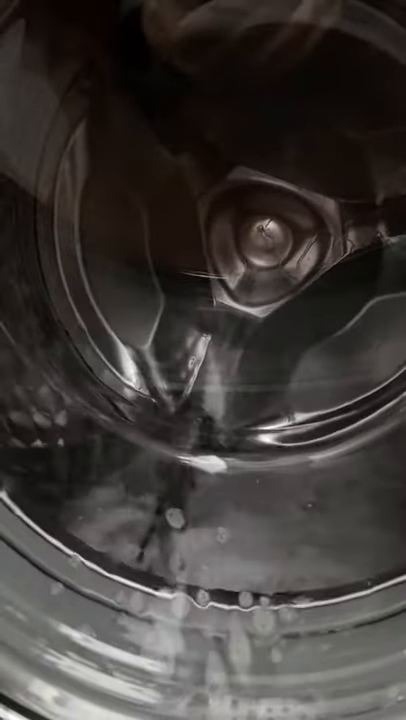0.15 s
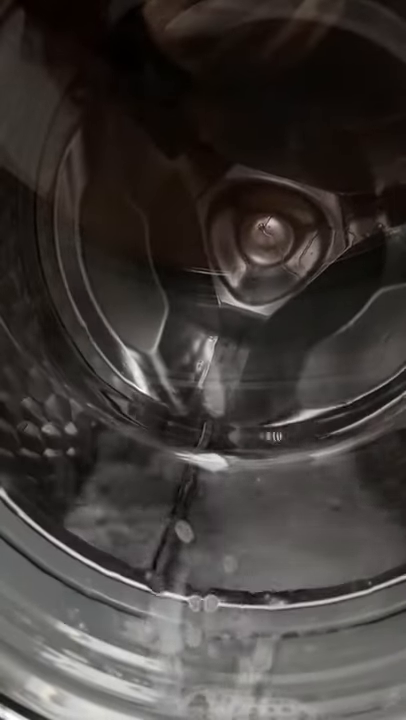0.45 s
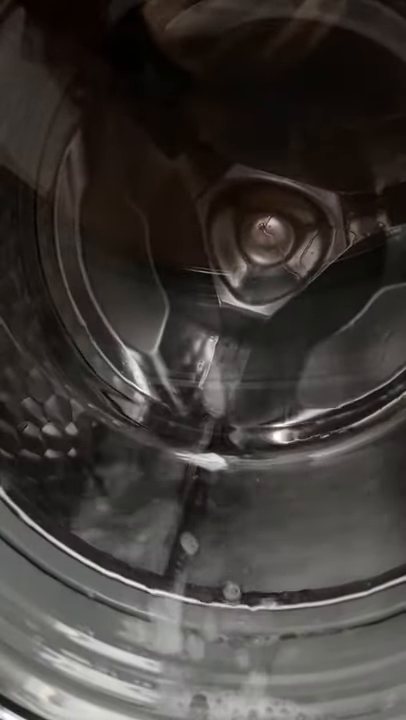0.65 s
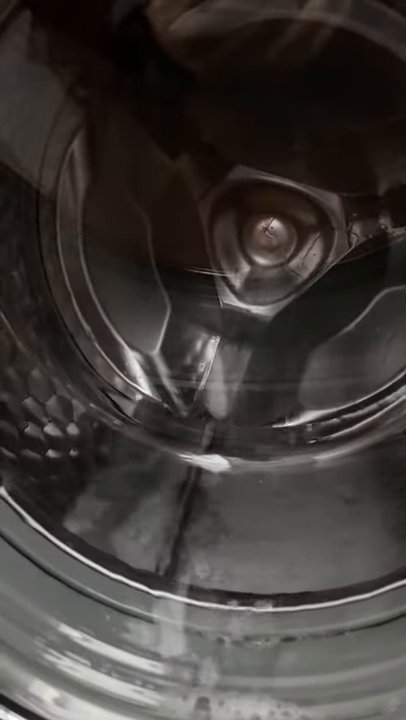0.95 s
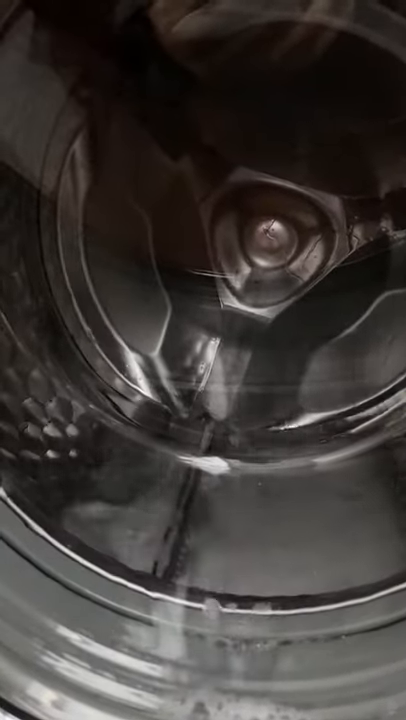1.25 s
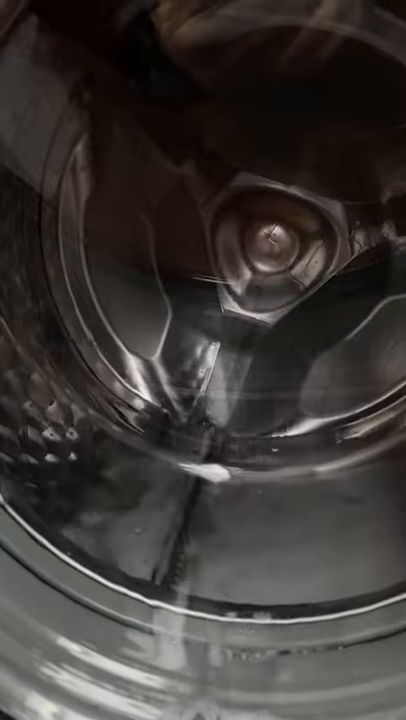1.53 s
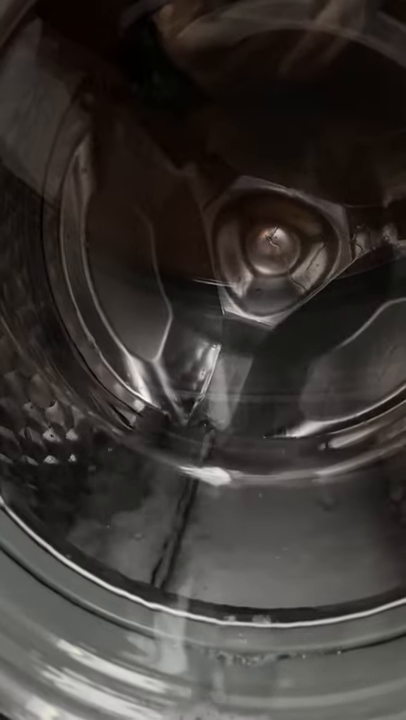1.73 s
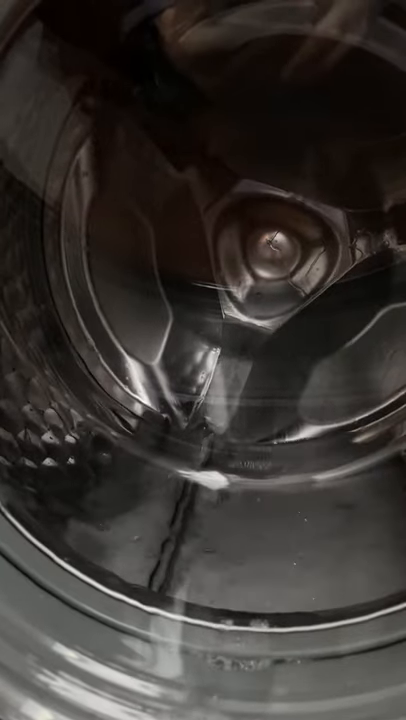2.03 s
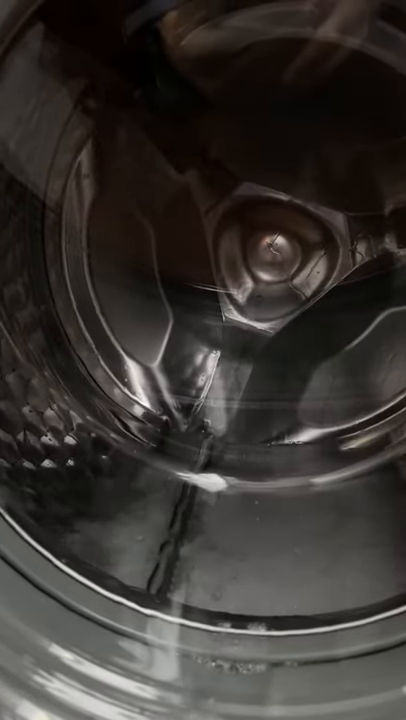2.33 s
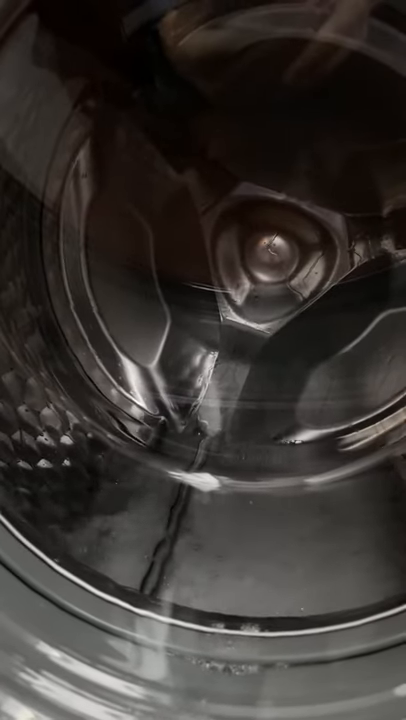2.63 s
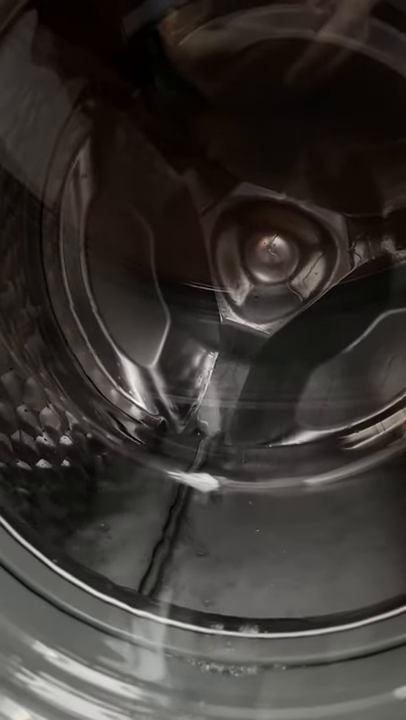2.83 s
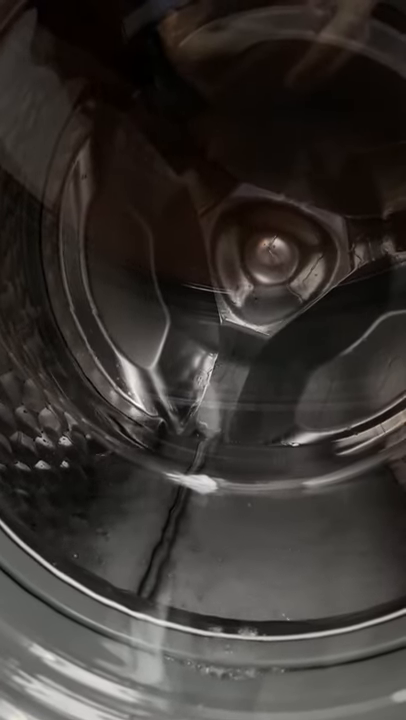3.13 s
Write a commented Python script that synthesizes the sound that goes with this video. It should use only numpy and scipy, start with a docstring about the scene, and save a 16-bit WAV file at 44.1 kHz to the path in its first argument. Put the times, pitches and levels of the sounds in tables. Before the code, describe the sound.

Water trickles and spatters inside a front-loading washing machine, heard close over a deep, wavering motor hum. A soft glug comes at about 0.2 seconds, followed by gentle sloshes and gurgles. Plopping drops are busiest from 0.9 to 1.8 seconds, ringing faintly on the steel drum. After 2 seconds the trickle thins to a few drips and faint sloshes, while the hum continues past 3 seconds.

```python
"""Wet load in a washing machine

A front-loader turns slowly, heard at the door in a small room. The drive hums through the cabinet.
Water trickles, plops and spatters, thins to a few drips, and sloshes as the load shifts. Trapped air
bubbles ring as damped oscillators, and the drops excite the modes of the steel drum."""
import sys
import numpy as np
from scipy import signal
from scipy.fft import rfft, irfft, next_fast_len
from scipy.io import wavfile
from scipy.ndimage import map_coordinates

SR = 44100
rng = np.random.default_rng(int(sys.argv[2]) if len(sys.argv) > 2 else 0)


def bounce(signal):
    """Save signal as a 16-bit WAV file at the path given by the first command-line argument."""
    frames = np.transpose(np.atleast_2d(signal))
    limited = np.clip(frames, -1, 1)
    pcm = np.round(limited * 32767).astype(np.int16)
    wavfile.write(sys.argv[1], SR, pcm)


N = 144648

# Strength of the running water. Each row: time in seconds, relative level in dB.
WATER_FLOW = [(0, -69), (.3, -73.5), (.65, -75.5), (.95, -70.5), (1.15, -70), (1.5, -72), (1.75, -79),
              (2.0, -76), (2.25, -86), (3.28, -92.5)]
# Drops that trap a bubble. Each row: time in seconds, relative peak level in dB, pitch in Hz.
BUBBLE_DROPS = [(.254, -47, 1200), (.385, -54.5, 2100), (.466, -51.5, 1220), (.625, -52.5, 1116),
                (.89, -53.5, 1223), (.928, -51, 1025), (1.016, -50.5, 1844), (1.034, -47.5, 1280),
                (1.273, -44, 1304), (1.335, -48, 1150), (1.435, -46, 1272), (1.447, -48.5, 1773),
                (1.552, -45.5, 1936), (1.625, -51, 1225), (1.673, -50, 816), (1.715, -52.5, 1034),
                (1.819, -46.5, 1020), (1.831, -51, 1370), (2.132, -56.5, 1210), (2.343, -52, 1580),
                (2.518, -61.5, 1560), (2.591, -56.5, 1226), (2.70, -55, 1227), (2.765, -60.5, 1336)]


def amp(db):
    """Amplitude grows tenfold for every 20 dB."""
    return 10 ** (np.asarray(db) / 20)

def unit(x):
    """Normalisation to an rms of 1."""
    return x / np.sqrt(np.mean(x ** 2) + 1e-20)

def pan(db):
    """Stereo gains for a level difference, left minus right."""
    return amp(db * np.array([[.5], [-.5]]))

def along(points, hz):
    """Interpolation of (Hz, value) points on a logarithmic frequency axis."""
    freqs, values = np.transpose(points)
    return np.interp(np.log(hz + 1), np.log(freqs + 1), values)

def envelope(rows):
    """Gain per sample, interpolated in dB between (seconds, dB) points."""
    times, levels = np.transpose(rows)
    return amp(np.interp(np.arange(N) / SR, times, levels))

def wobble(rate):
    """Smooth random modulation through `rate` knots a second."""
    return map_coordinates(rng.standard_normal(200), [np.arange(N) * rate / SR], mode="wrap")

def filtered(x, response):
    """Linear filtering: the spectrum is multiplied by a frequency response."""
    n = x.shape[-1]
    padded = next_fast_len(n + SR // 10)
    return irfft(rfft(x, padded) * response(np.fft.rfftfreq(padded, 1 / SR)), padded)[..., :n]

def coloured(x, spectrum):
    """Spectral shaping by (Hz, dB) points, at rms 1."""
    return unit(filtered(x, lambda hz: amp(along(spectrum, hz))))

def add(out, start_s, x):
    """Superposition of x on out, from a given time."""
    i = max(0, round(start_s * SR))
    out[..., i:i + x.shape[-1]] += x[..., :max(0, N - i)]

def noise(size=N):
    """Partly coherent white noise: left and right agree in the bass, far less in the treble."""
    # Each row: frequency in Hz, left-right correlation from -1 to 1.
    correlation = [(110, 1), (330, 0.87), (650, -0.16), (1300, 0.32), (2800, 0.07), (5500, -0.14),
                   (11000, -0.6)]
    def mid_side_gains(hz):
        angle = np.arccos(np.clip(along(correlation, hz), -1, 1)) / 2
        return np.array([np.cos(angle), np.sin(angle)])
    mid, side = filtered(rng.standard_normal((2, size)), mid_side_gains)
    return np.array([mid + side, mid - side])

def rumble(modes):
    """Forced vibration: noise drives a body's resonances, at rms 1."""
    def response(f):
        return sum(amp(db) / (1 + ((f - hz) / half_width) ** 2) for hz, half_width, db in modes)
    return unit(filtered(noise(), response))

def in_tub(x, tail_db=8):
    """Reverberation: the direct sound is followed by a short stereo tail from the tub."""
    # Each row: frequency in Hz, time to decay by 60 dB in seconds.
    decay_times = [(300, 0.42), (1500, 0.088), (5000, 0.1), (12000, 0.063)]
    hz, t, spectra = signal.stft(noise(size=SR // 6), SR, nperseg=256)
    tail = signal.istft(spectra * amp(-60 * t / along(decay_times, hz)[:, None]), SR, nperseg=256)[1]
    tail *= amp(tail_db) / np.linalg.norm(tail[0])
    reflected = signal.fftconvolve(x[None], tail, axes=1)[:, :len(x)]
    return (x + reflected) / np.hypot(1, amp(tail_db))

def bubble(t, hz, cycles, rise, attack_s):
    """A damped oscillator: it loses 60 dB in `cycles` periods and rises in pitch near the surface."""
    age = t * hz / cycles
    phase = 2 * np.pi * hz * t * (1 + rise * (age - .5) / 2)
    return np.sin(phase) * amp(-60 * age) * (1 - np.exp(-t / attack_s))

def bubbles(per_s, low_hz, high_hz, cycles, spread_db):
    """Superposition of bubbles at random times and pitches, mostly faint, a few loud."""
    when, pitch, strength = rng.random((5000, 3))[:int(per_s * N / SR)].T[..., None]
    k = np.arange(min(SR // 40, int(SR * cycles / low_hz)))
    hz = low_hz * (high_hz / low_hz) ** pitch
    gain = amp(spread_db * strength ** 3) * hz / low_hz
    rings = gain * bubble(k / SR, hz, cycles, rise=0.11, attack_s=0.00018)
    positions = (when * N).astype(int) + k
    return np.bincount(positions.ravel(), rings.ravel(), N)[:N]

def drive(hum_hz=45.6, waver_db=3.5):
    """Forced vibration: the drive makes a deep hum and weaker wavering tones, and shakes the cabinet."""
    # The deep hum. Each row: time in seconds, rms level in dB.
    hum_levels = [(0, -36.5), (.46, -43.5), (.65, -36), (.91, -46), (1.43, -39), (1.86, -48.5),
                  (2.07, -39.5), (2.6, -43.5), (2.71, -38), (3.07, -47)]
    # The drive's tones. Each row: frequency in Hz, rms level in dB.
    tones = [(58, -58), (102, -61.5), (183.5, -72.5), (1284, -88.5)]
    # Cabinet resonances. Each row: frequency in Hz, half-width in Hz, relative level in dB.
    cabinet_modes = [(43.3, 24, 3), (102.7, 7.4, 4), (126, 18, -4), (188.3, 13, -5.5), (274.3, 29, -15.5),
                     (364.7, 12, -16), (600, 43, -17.5)]
    t = np.arange(N) / SR
    hum = envelope(hum_levels) * np.sin(2 * np.pi * hum_hz * t)
    for hz, db in tones:
        hum += amp(db + waver_db * wobble(10)) * np.sin(2 * np.pi * hz * t + wobble(4.743))
    return np.sqrt(2) * hum + amp(-54.5) * rumble(cabinet_modes)

def room_air():
    """Stationary background noise, strongest in the bass."""
    # Each row: frequency in Hz, relative spectral level in dB.
    air_spectrum = [(25, -14.5), (80, -4.5), (170, -8), (320, -22), (620, -20.5), (900, -30.5),
                    (1260, -27.5), (1600, -36), (6000, -43.5), (12500, -51.5)]
    return amp(-66) * coloured(noise(), air_spectrum)

def trickle(fizz_db=-0.5):
    """Air entrainment: water running off the load traps small ringing bubbles over a fine fizz."""
    # Each row: frequency in Hz, filter gain in dB.
    trickle_colour = [(300, -43), (600, -2), (1100, -9.5), (1550, -15), (2500, -15.5), (4100, -15),
                      (5000, -22.5), (5800, -20.5), (7900, -23.5), (9000, -33), (10400, -25.5),
                      (12500, -57)]
    stream = unit(bubbles(per_s=700, low_hz=974, high_hz=13100, cycles=13, spread_db=19))
    fizz = amp(fizz_db) * rng.standard_normal(N)
    return amp(3) * envelope(WATER_FLOW) * coloured(in_tub(stream + fizz), trickle_colour)

def steel(hz, t60, attack_s, lag_s=0.00005):
    """One exponentially decaying mode of the drum, reaching the right side a little later."""
    t = np.maximum(np.arange(SR // 2) / SR - lag_s * np.array([[0], [1]]), 0)
    return np.sin(2 * np.pi * hz * t) * amp(-60 * t / t60) * (1 - np.exp(-t / attack_s))

def drum_ring(strikes_per_s=260, spread_db=3, flutter_db=3):
    """Random impact excitation: pattering water keeps the steel drum's modes shimmering."""
    # Each row: mode frequency in Hz, level in dB relative to the flow.
    drum_modes = [(1174, -4.5), (1884, -9.5), (2542, -11), (2922, -7.5), (3603, -19), (6243, -21.5)]
    landings = rng.integers(0, N, int(strikes_per_s * N / SR))
    flow, out = envelope(WATER_FLOW), np.zeros((2, N))
    for hz, db in drum_modes:
        forces = amp(spread_db * rng.standard_normal(len(landings)))
        strikes = flow * unit(np.bincount(landings, forces, N))
        mode = steel(hz, t60=.11, attack_s=0.0033)
        ring = signal.fftconvolve(strikes[None], mode / np.linalg.norm(mode[0]), axes=1)[:, :N]
        out += amp(db + flutter_db * wobble(58)) * ring
    return out

def churn(glug_s=.178, glug_hz=565):
    """Resonance of the tub and of large bubbles: moving water rumbles, gurgles and glugs once."""
    # Rumble and gurgle envelopes. Each row: time in seconds, relative level in dB.
    rumble_levels = [(0, -78), (.3, -61.5), (1.05, -58), (1.7, -64), (2.4, -69.5), (2.75, -65.5),
                     (3.28, -83)]
    gurgle_levels = [(0, -76), (.28, -63), (.57, -74.5), (1.05, -64.5), (1.8, -65.5), (2.02, -71.5),
                     (2.3, -65.5), (2.49, -85.5), (2.64, -70.5), (2.95, -69), (3.1, -88), (3.28, -65.5)]
    # Tub resonances. Each row: frequency in Hz, half-width in Hz, relative level in dB.
    tub_modes = [(258.4, 22.7, -0.5), (288.7, 10, -11), (356.7, 11, -6), (417.4, 24, -9)]
    # Each row: frequency in Hz, filter gain in dB.
    gurgle_colour = [(200, -43), (450, -3), (620, 5), (780, 4.5), (1000, -2.5), (1400, -8), (2200, -39.5),
                     (5000, -60)]
    stream = bubbles(per_s=300, low_hz=416.6, high_hz=1372, cycles=18, spread_db=18)
    gurgle = envelope(gurgle_levels) * coloured(in_tub(stream), gurgle_colour)
    out = amp(-0.5) * (envelope(rumble_levels) * rumble(tub_modes) + gurgle)
    glug = bubble(np.arange(SR // 5) / SR, glug_hz, cycles=75, rise=0.054, attack_s=0.033)
    add(out, glug_s, amp(-42) * glug)
    return out

def drops(rows, cycles, rise, attack_s, lead_s, splash_db, splash_t60):
    """Impact and entrainment: each drop makes a brief splash, a bubble and two fainter ones."""
    splash_octaves, scatter_octaves, follow_s, follow_db = 0.52, 0.18, .018, -9
    out, t = np.zeros((2, N)), np.arange(SR // 6) / SR
    for time_s, db, hz in rows:
        def splash_band(f):
            return 1 / (1 + (np.log2((f + 1) / hz) / splash_octaves) ** 2) ** 1.55
        splash = unit(filtered(rng.standard_normal(len(t)), splash_band))
        splash *= amp(splash_db - 60 * t / splash_t60) * (1 - np.exp(-t / attack_s))
        rings = bubble(t, hz, cycles, rise, attack_s)
        for late, pitch in rng.random((2, 2)):
            delayed = np.maximum(t - follow_s * late, 0)
            follower_hz = hz * 2 ** (scatter_octaves * (2 * pitch - 1))
            rings += amp(follow_db) * bubble(delayed, follower_hz, cycles, rise, attack_s)
        drop = in_tub(rings + splash)
        add(out, time_s - lead_s, amp(db) * drop / np.abs(drop).max())
    return out

def ticks():
    """Impact transients: small drops on steel and glass make short, high rings."""
    # Each row: time in seconds, relative peak level in dB, pitch in Hz.
    small_drops = [(.094, -54, 6030), (.158, -67.5, 7260), (.193, -63, 5560), (.251, -61, 3700),
                   (.29, -60, 3010), (.43, -69.5, 10200), (.455, -64.5, 3570), (.514, -61, 3980),
                   (.834, -62.5, 3740), (.845, -68.5, 10100), (.943, -60, 6840), (1.297, -54, 4070),
                   (1.44, -64.5, 7000), (1.503, -60.5, 5900), (1.817, -65.5, 6150), (1.645, -61, 4460),
                   (2.03, -60, 2800)]
    return amp(1.5) * drops(small_drops, cycles=195, rise=0.076, attack_s=.005,
                            lead_s=0.0035, splash_db=-4, splash_t60=0.045)

def drum_pings(struck_hz=2922, coupling_db=-11.5, loss_db_per_octave=16, flutter_db=2.8):
    """Impact and sympathetic resonance: drops ring the drum directly or through their bubbles."""
    # Drops on bare steel. Each row: start in seconds, relative peak level in dB.
    impacts = [(0.241, -64), (0.506, -68.5), (0.956, -65), (1.152, -63.5), (1.29, -66), (1.516, -70),
               (1.642, -67.5), (1.96, -69), (2.913, -74.5)]
    # The two mode frequencies in Hz; a bubble stirs the one nearer its pitch.
    coupled_hz = (1174, 1884)
    rings = [(start_s, db, struck_hz) for start_s, db in impacts]
    for start_s, db, hz in BUBBLE_DROPS:
        mistuning = np.abs(np.log2(np.array(coupled_hz) / hz))
        stirred_db = db + coupling_db - loss_db_per_octave * mistuning.min()
        rings.append((start_s, stirred_db, coupled_hz[mistuning.argmin()]))
    out = np.zeros((2, N))
    for start_s, db, hz in rings:
        ring = steel(hz, t60=.17, attack_s=.008)
        add(out, start_s, amp(db) * ring / np.abs(ring).max())
    return out * amp(flutter_db * wobble(58.2))

def sloshes(fall_db=19):
    """Breaking sheets of water entrain air: shallow ones as spray, deep ones as a gulp of big bubbles."""
    # Each row: crest, rise and fall times in seconds, crest level in dB, depth from 0 (spray) to 1 (gulp).
    waves = [(.249, 0.0042, 0.051, -60, 0.79), (0.431, 0.078, 0.062, -62.5, 0.15),
             (0.859, 0.082, 0.17, -65, 0.23), (1.055, 0.099, 0.11, -60, 0.91),
             (1.888, 0.1, 0.089, -63, 0.45), (2.35, 0.019, 0.076, -68, 0.95),
             (2.916, 0.16, 0.065, -69.5, .05)]
    # Each row: frequency in Hz, filter gain in dB.
    spray_colour = [(300, -24), (1000, -3), (2500, 2.5), (6500, -7.5), (9000, -11), (12000, -20)]
    gulp_colour = [(250, -6.5), (900, 5), (1900, -5), (12000, -55.5)]
    fine = bubbles(per_s=850, low_hz=980, high_hz=11000, cycles=5.7, spread_db=6.5)
    spray = coloured(in_tub(fine), spray_colour)
    large = bubbles(per_s=900, low_hz=462, high_hz=4540, cycles=17, spread_db=5.5)
    gulp = coloured(in_tub(large), gulp_colour)
    out, t = np.zeros((2, N)), np.arange(N) / SR
    for crest_s, rise_s, fall_s, db, depth in waves:
        from_crest = np.maximum((crest_s - t) / rise_s, (t - crest_s) / fall_s)
        swell = amp(db - fall_db * from_crest ** 2)
        out += swell * (np.sqrt(1 - depth) * spray + np.sqrt(depth) * gulp)
    return out

def plops():
    """Bubble resonance: air trapped by a drop rings briefly with a rising pitch."""
    return amp(-2.5) * drops(BUBBLE_DROPS, cycles=30, rise=0.27, attack_s=.004,
                             lead_s=.006, splash_db=-9, splash_t60=0.042)

def plinks():
    """Lightly damped resonance: small bubbles in the last drips ring for many cycles."""
    # Each row: time in seconds, peak level in dB, pitch in Hz.
    last_drips = [(2.325, -61.5, 2620), (2.455, -69, 2250), (2.688, -71.5, 2810)]
    return drops(last_drips, cycles=130, rise=0.066, attack_s=0.0091,
                 lead_s=.003, splash_db=-13, splash_t60=0.048)

def scene():
    """Superposition of the water in the drum, the drive below it and the room's steady air."""
    # The water's stereo balance. Each row: frequency in Hz, left minus right in dB.
    balance = [(300, -0.5), (700, 3), (1400, 0), (2800, -3), (5600, -1), (10000, 0.5)]
    drips = plops() + ticks() + plinks()
    drum = (drum_ring() + drum_pings()) * pan(-2)
    water = trickle() + drips + drum + sloshes() + churn()
    return filtered(water, lambda hz: pan(along(balance, hz))) + drive() + room_air()

def record(dry):
    """Band limiting: the microphone loses the deepest bass and the highest treble."""
    low_cut_hz, top_hz = 44, 12500
    return filtered(dry, lambda hz: (hz < top_hz) / np.sqrt(1 + (low_cut_hz / (hz + 1)) ** 10))


dry = scene()
out = record(dry)
bounce(out)
```